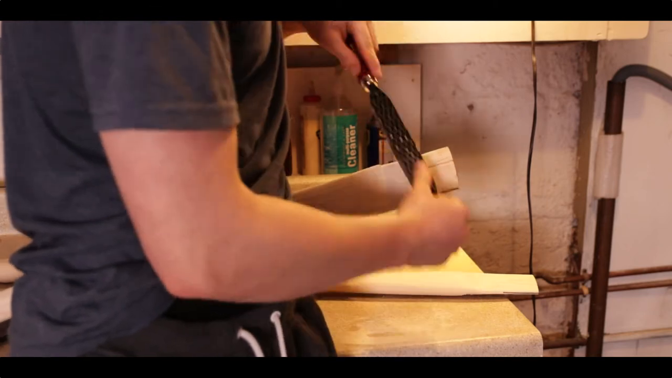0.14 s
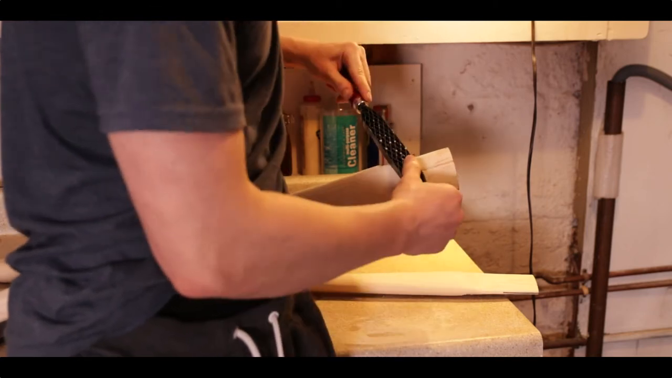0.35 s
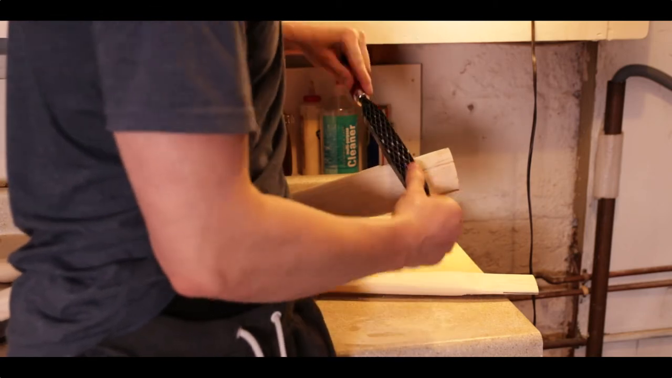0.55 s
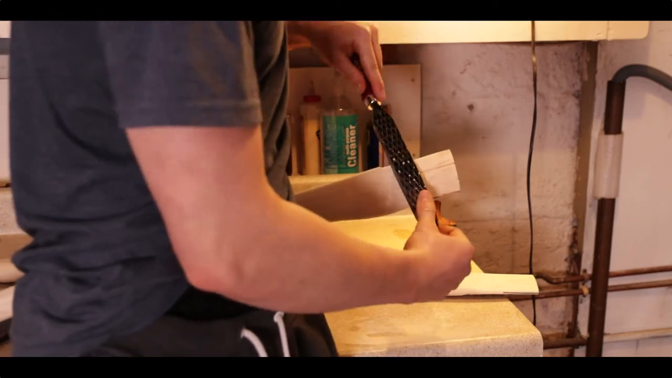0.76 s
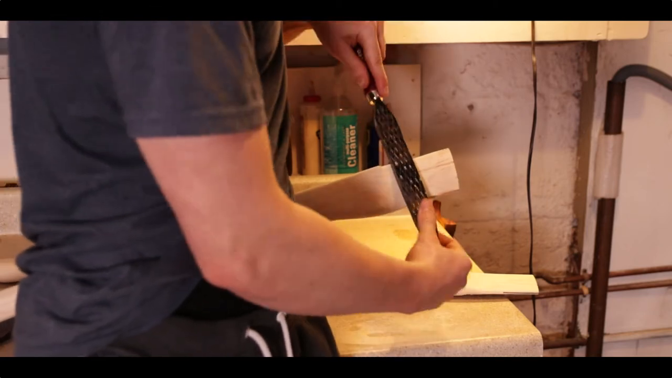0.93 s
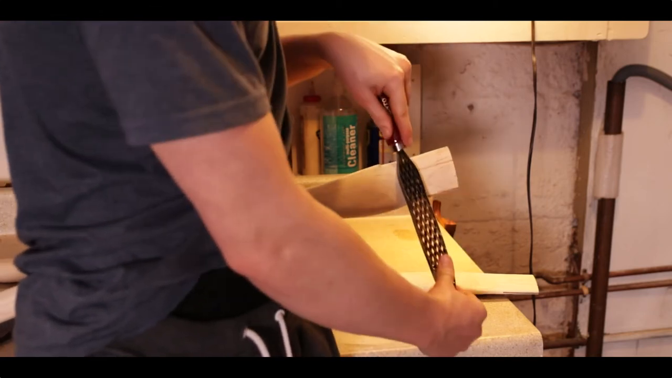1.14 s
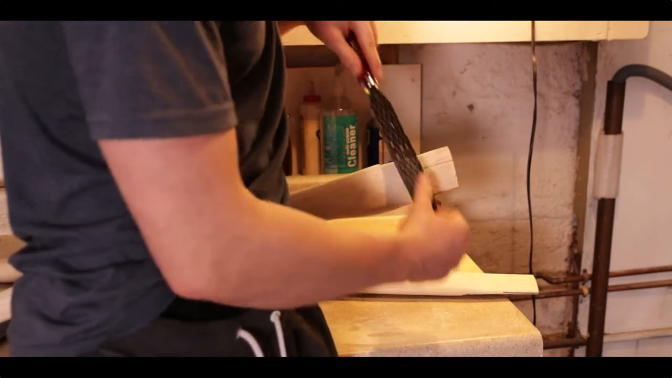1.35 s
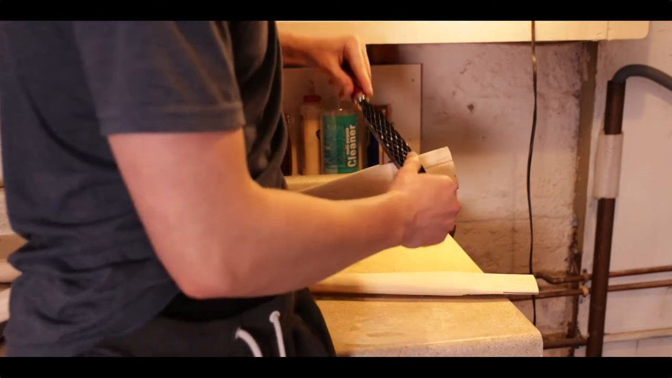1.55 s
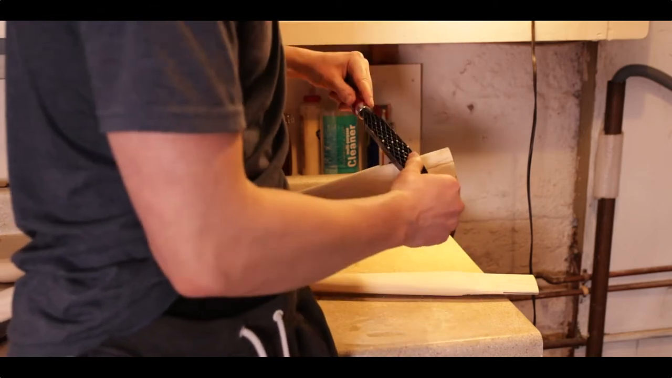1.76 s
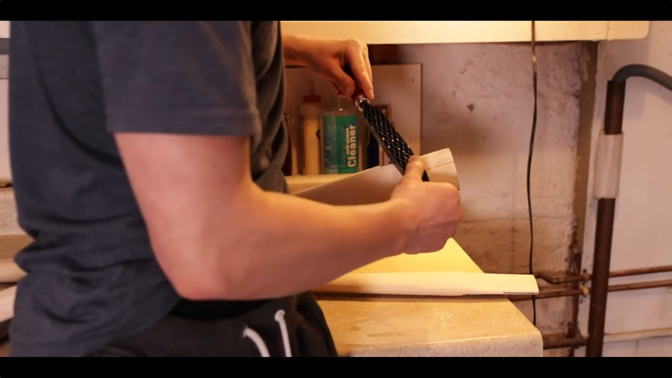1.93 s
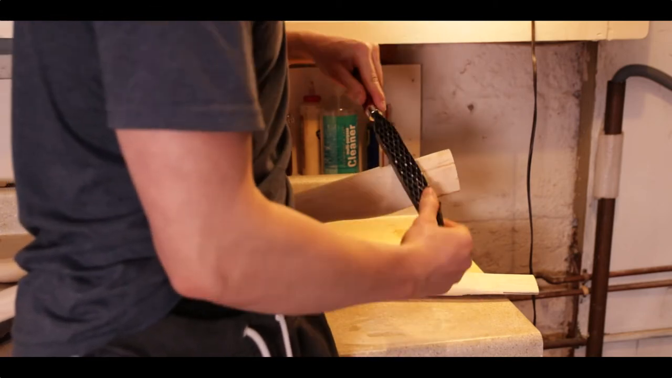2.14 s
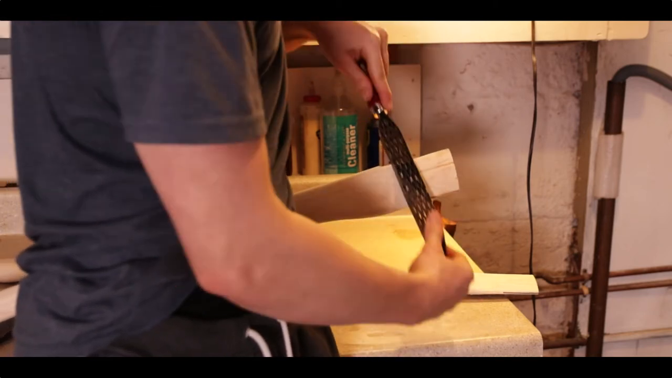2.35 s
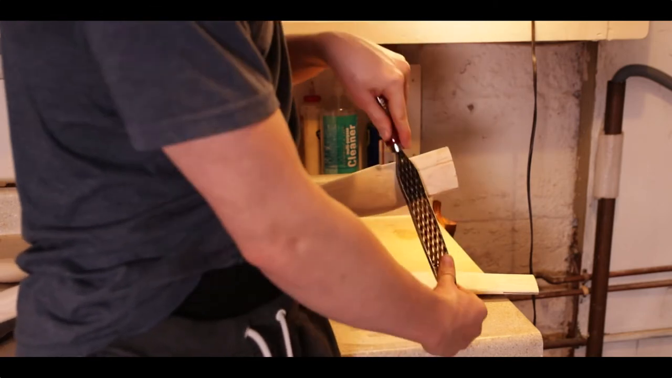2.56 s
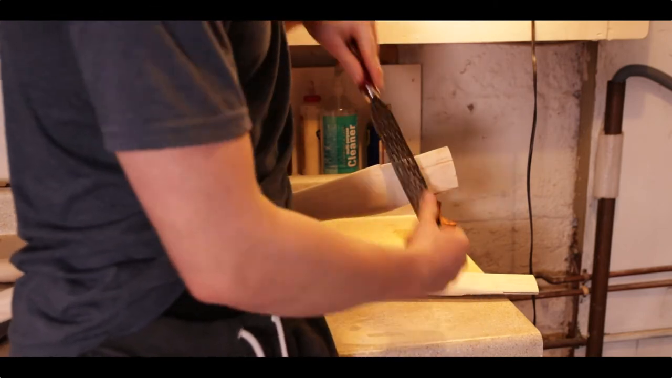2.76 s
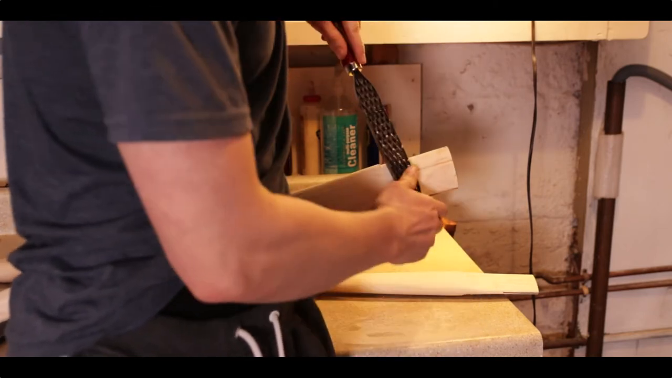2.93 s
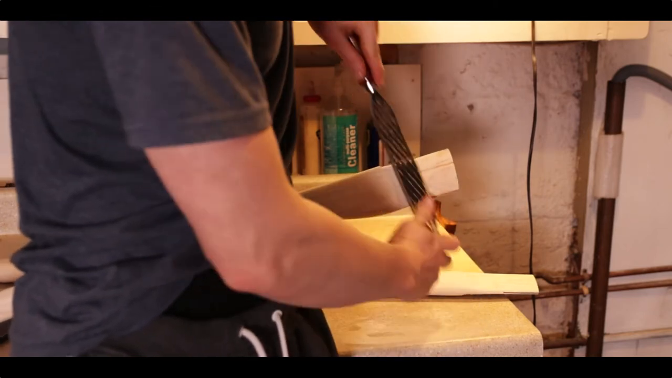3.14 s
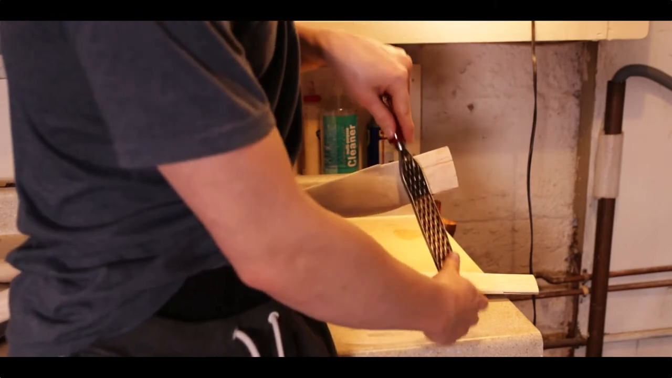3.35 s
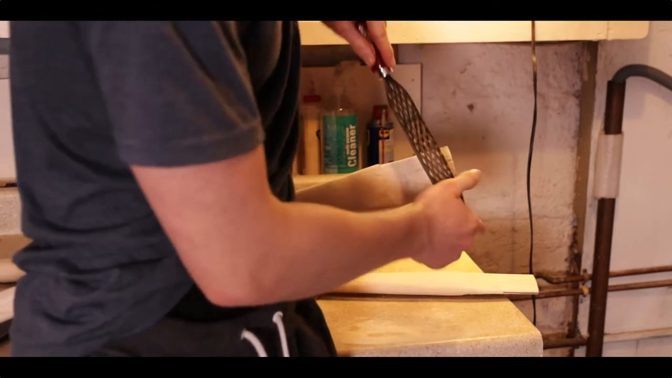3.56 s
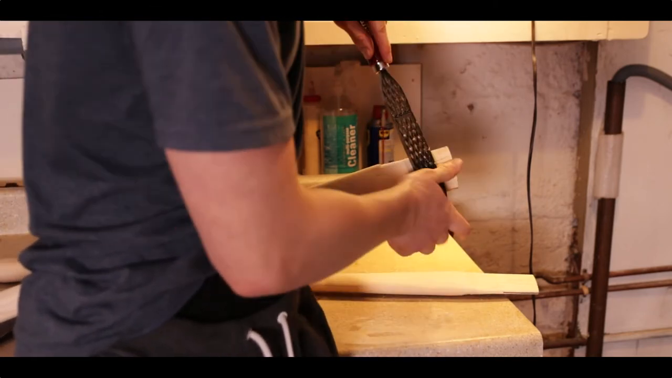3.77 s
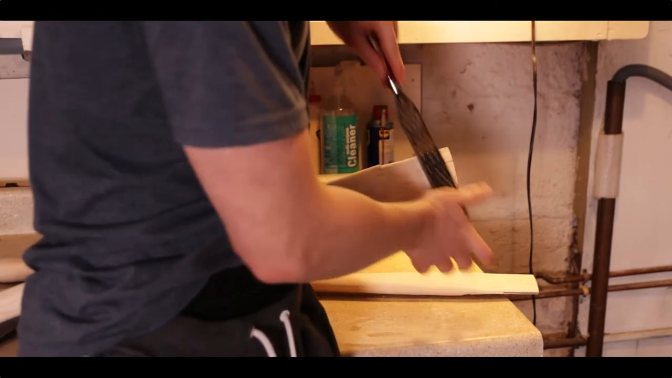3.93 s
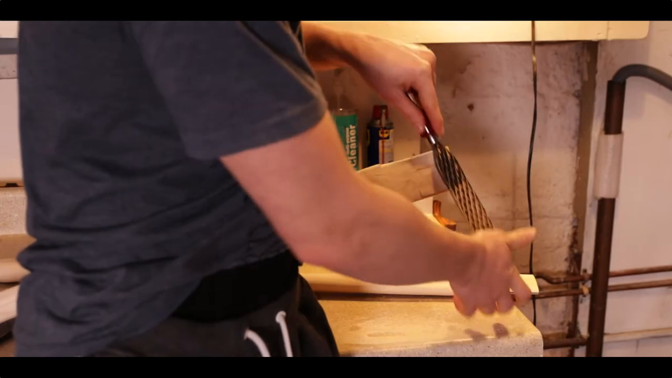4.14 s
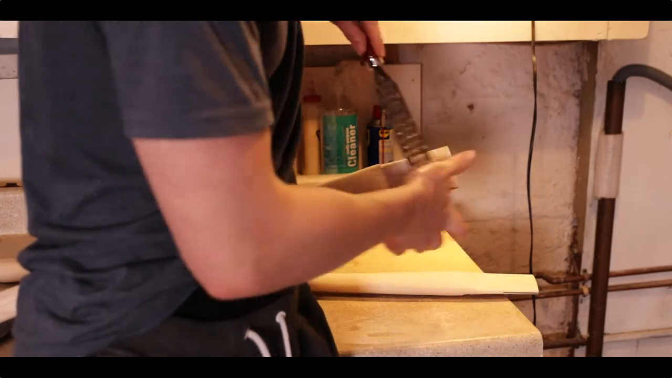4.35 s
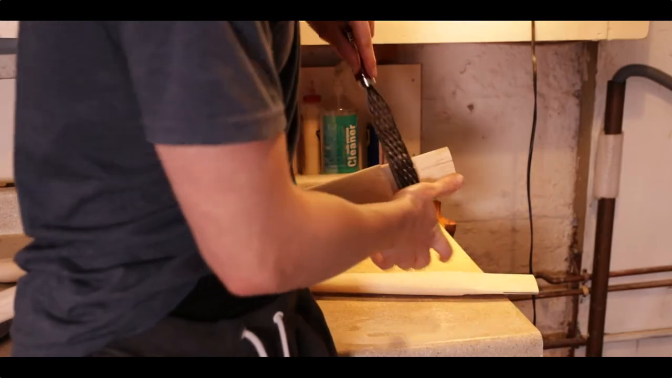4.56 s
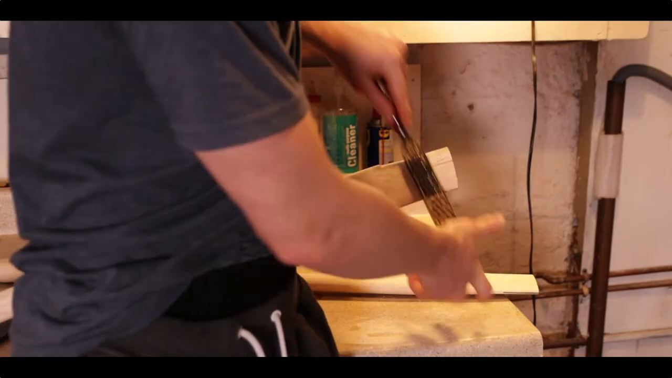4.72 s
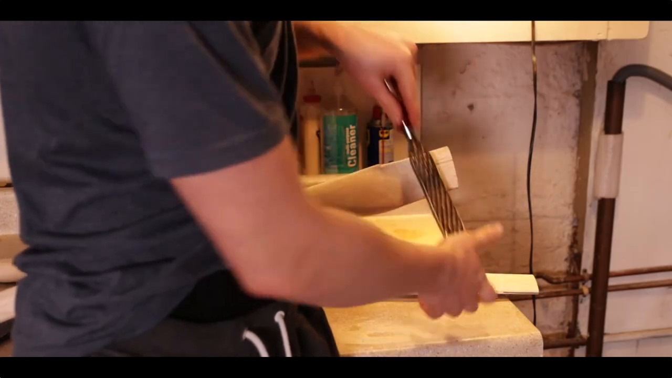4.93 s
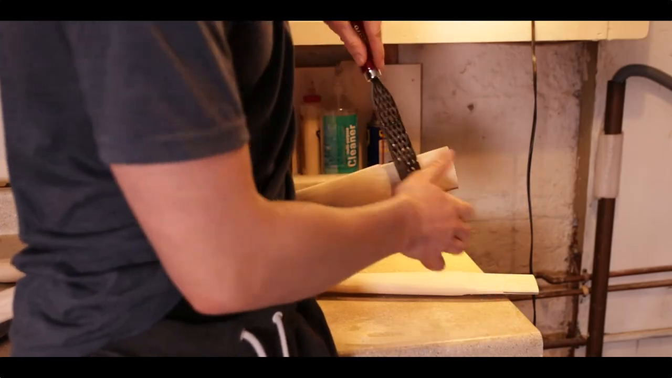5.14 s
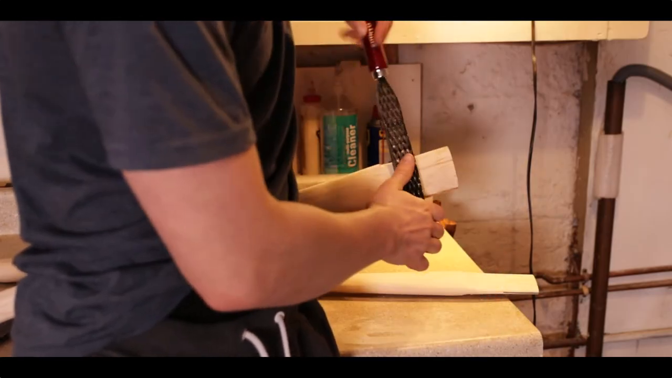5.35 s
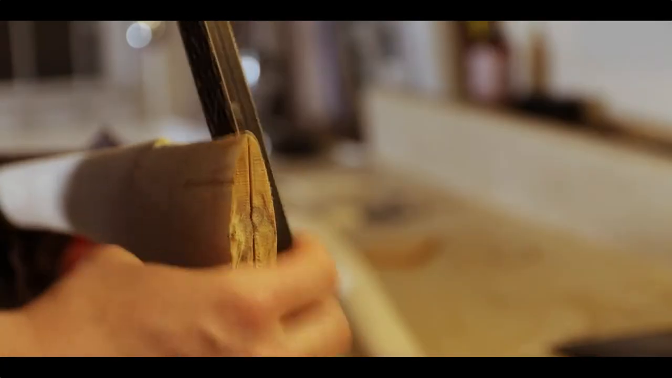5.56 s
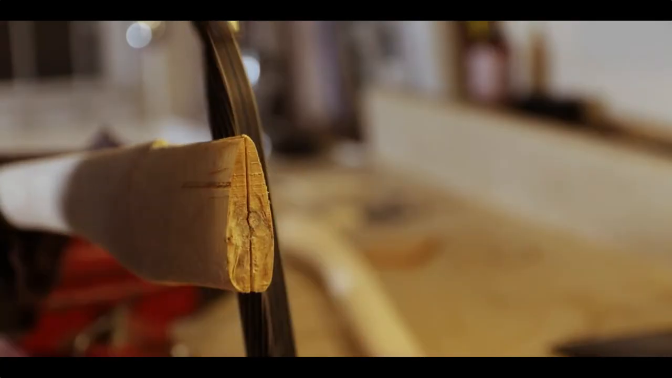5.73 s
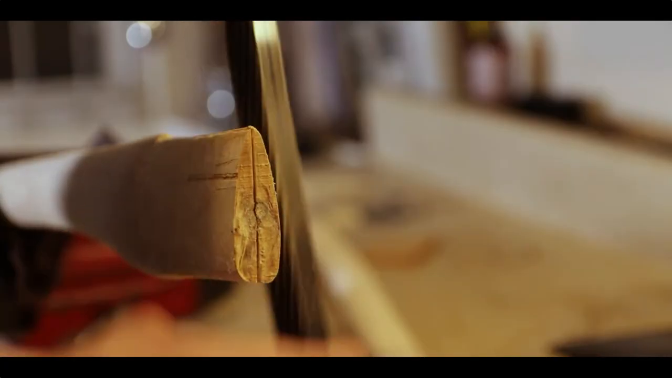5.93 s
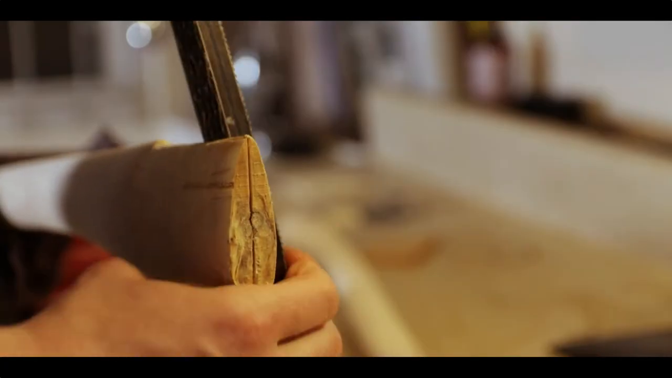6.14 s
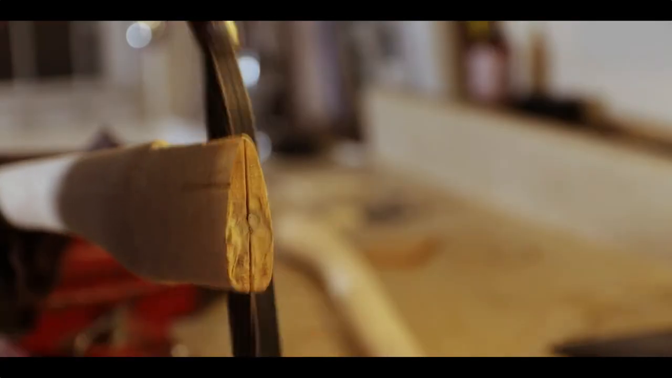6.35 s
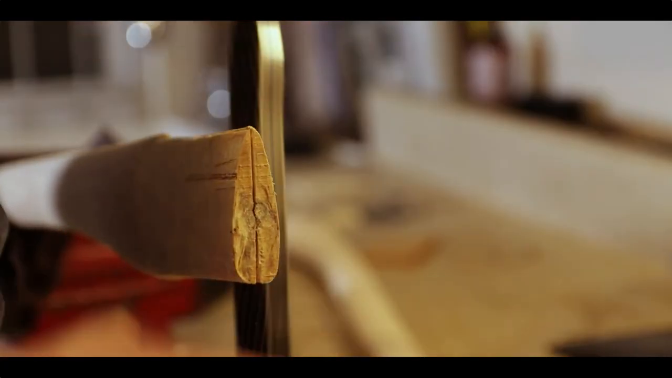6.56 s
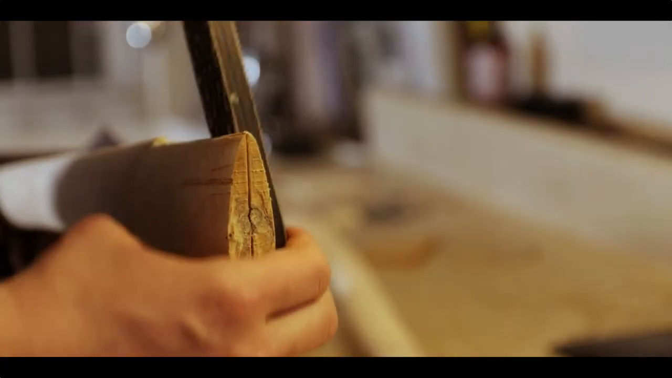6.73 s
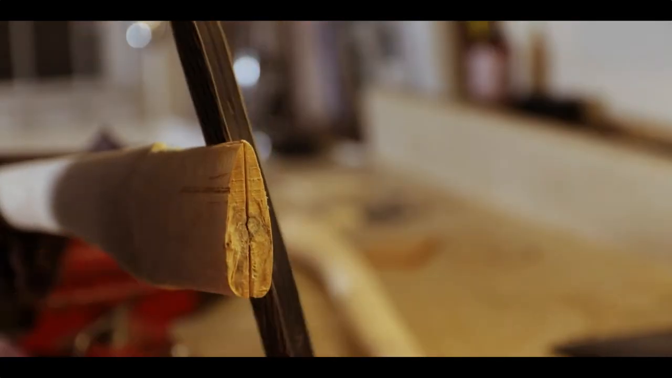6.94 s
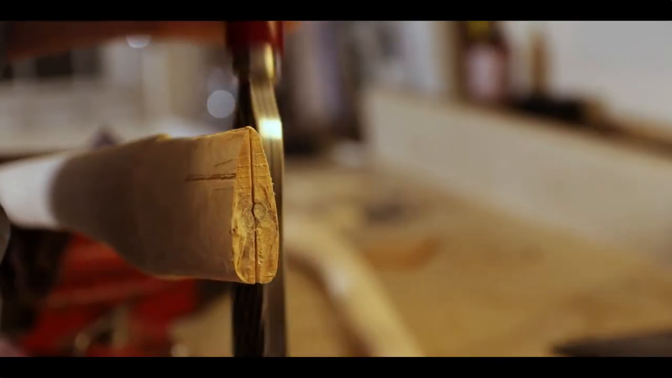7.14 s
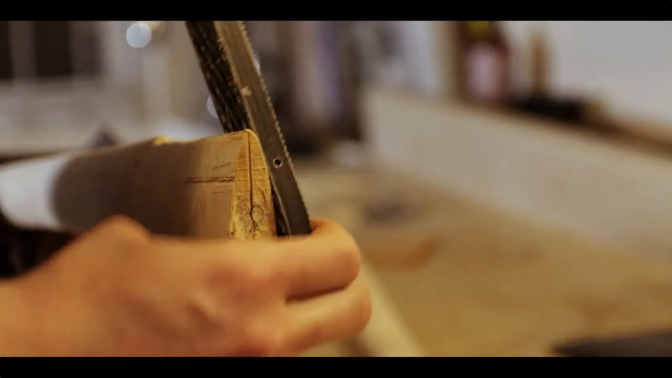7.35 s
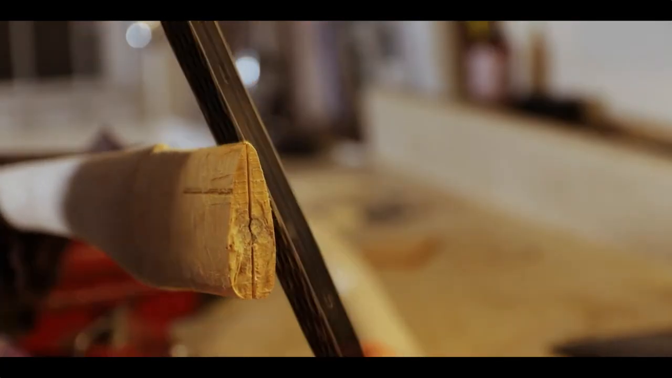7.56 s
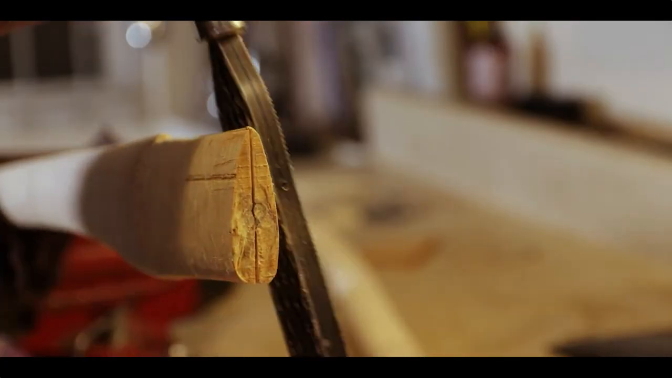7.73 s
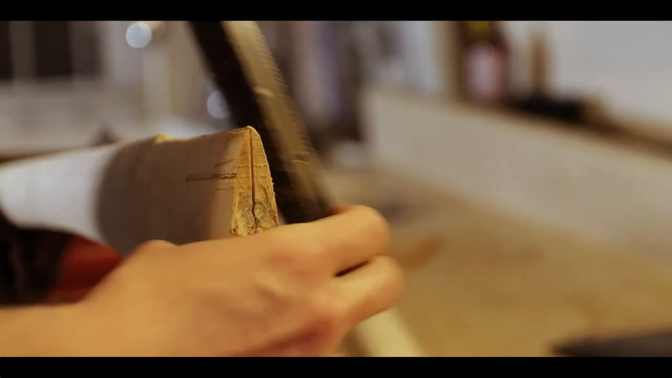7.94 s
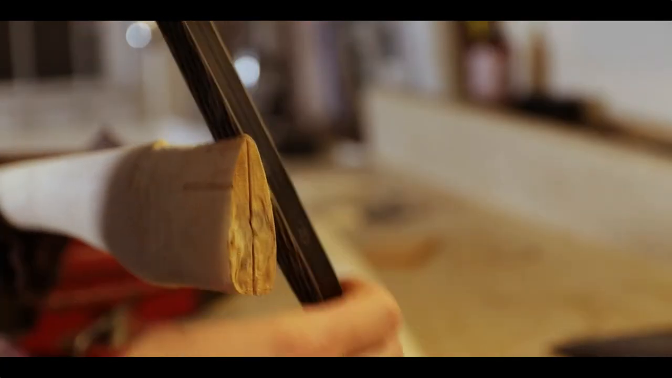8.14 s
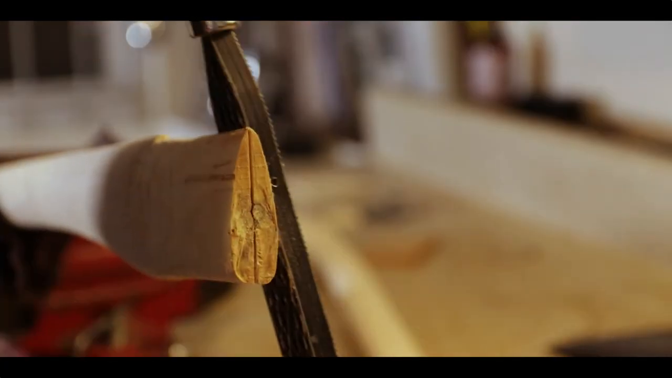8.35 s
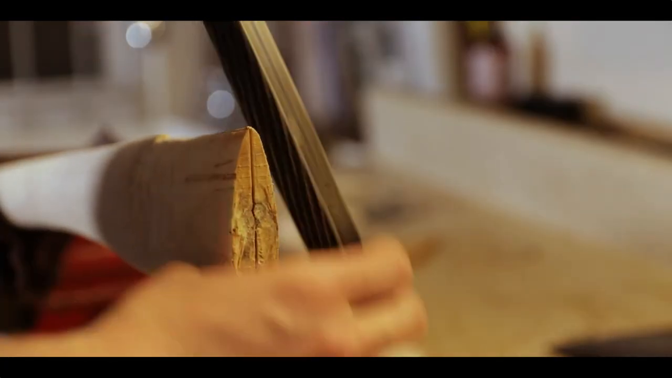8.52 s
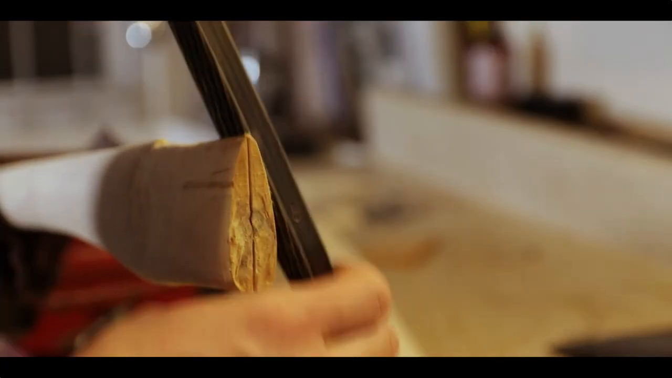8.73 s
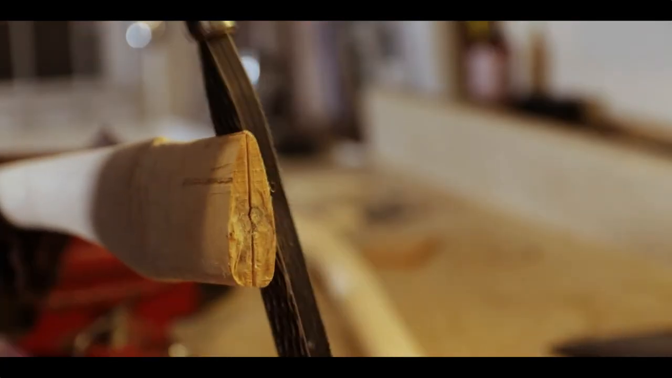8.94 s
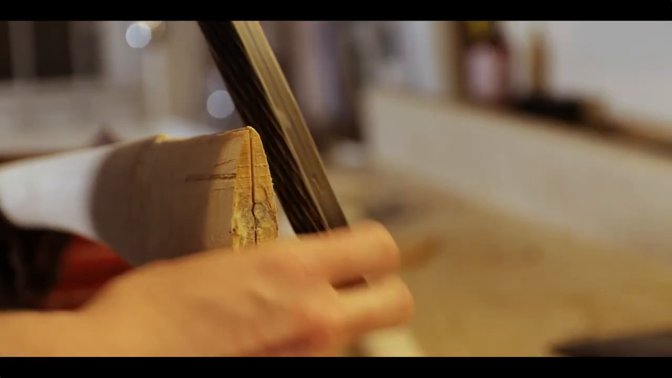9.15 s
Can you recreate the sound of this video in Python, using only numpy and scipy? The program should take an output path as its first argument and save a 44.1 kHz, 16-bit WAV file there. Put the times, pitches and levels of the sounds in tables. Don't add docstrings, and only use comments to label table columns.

```python
import sys
import numpy as np
from scipy import signal
from scipy.fft import rfft, irfft, next_fast_len
from scipy.io import wavfile
from scipy.ndimage import uniform_filter1d, map_coordinates

SR = 44100
rng = np.random.default_rng(int(sys.argv[2]) if len(sys.argv) > 2 else 0)


def volts(x):
    e = np.asarray(x, float) / 20
    return 10 ** e


def waveform_to_disk(signal):
    frames = np.transpose(np.atleast_2d(signal))
    scaled = np.clip(frames, -1, 1) * 32767
    samples = np.round(scaled).astype(np.int16)
    wavfile.write(sys.argv[1], SR, samples)


N = 409688
SPAN = 32768
MOVE_IN = 5.495

# frequency in Hz, density in dB per Hz.
QUIET = [(12, -51.5), (20, 1), (120, 9), (241, 4), (301, 4), (660, -1), (738, -6.5), (4940, -11.5),
         (8180, -13.5), (16000, -16)]
# frequency in Hz, t60 in seconds.
CELLAR = [(100, 0.46), (300, 0.23), (1500, 0.11), (5000, 0.19), (12000, 0.035)]

# frequency in Hz, density in dB per Hz.
FAR = [(18, -114), (30, -36), (88, -6), (157, -1.5), (210, -0.5), (259, -10.5), (666, -10), (1540, -10.5),
       (3310, -14), (5590, -26), (14000, -38.5), (16000, -42.5)]
NEAR = [(18, -53), (30, -23), (88, -8), (245, -13.5), (721, -15), (822, -16), (1910, -13.5), (2540, -11),
        (3670, -13), (5450, -18.5), (12600, -25), (16000, -34)]
# centre in Hz, width in Hz, height in dB.
FAR_MODES = [(101.2, 20.6, 11), (208, 13, 9), (335.6, 45, 6.5), (452, 16, 6), (612, 13, -1), (730, 87, 1.5),
             (948, 41, -1), (1070, 36, -9.5)]
NEAR_MODES = [(96.3, 14, 13), (183, 12, 14.2), (428, 43, 4.8), (579, 8.3, 4), (720.6, 20, 9),
              (743, 14, 6.9), (1924, 46, 8.2), (8600, 1600, 4.1), (12700, 460, 3.6)]
# centre in Hz, width in Hz, dB held loosely, dB held firmly at the tip.
BLADE = [(1345, 55, 14.5, -3), (1421, 42, 4, 3), (1710, 42, 5, 1), (1894, 59, 6, 7.5), (2205, 43, 9.5, 11),
         (2950, 330, -15, 12.5), (3350, 91, 18.5, 2.5), (3552, 63, 2, -0.5), (3730, 81, 4, 12),
         (4454, 200, 3, 7.5), (4960, 89, 3.5, 5), (6900, 80, -12.5, 14)]
# low edge in Hz, high edge in Hz.
EDGES_HZ = [(1200, 5500), (290, 1200), (20, 290), (5500, 20000)]
# time in seconds, firmness from 0 to 1.
FIRM = [(0, 0.85), (3.8, 0.4), (3.9, 0.98), (4.49, 0.56), (7.3, 0.57), (7.45, 1), (9.3, 0.9)]
# time in seconds, level in dB.
LEAN = [(0, 7), (.6, -3), (1.6, 6), (2.0, -8.5), (3.0, 9.5), (3.7, -17), (3.899, 10), (4.502, 2), (4.56, 4),
        (5.2, -5), (5.5, -11.5), (5.6, -1), (6.9, -2), (8, -5.5), (9.3, 3)]

# start in seconds, rise in seconds, hold in seconds, pressure in dB, brightness in dB.
DRAGS = [
    (0, 0.00067, 0.0014, -41, 0),
    (6.64, .17, 0.032, -31.5, 0),
]
HOVERS = [
    (.38, 0.017, 0.17, -51, 0),
    (1.25, 0.032, 0.53, -51, 0.0068),
    (1.7, 0.025, 0.11, -66, 0),
    (3.84, .05, .01, -44, 0),
    (7.27, .09, 0.017, -43, 0),
    (7.86, 0.12, 0.052, -40.5, 0),
    (9.12, 0.2, 0.0304, -42, 0),
]
DIGS = [
    (.594, .084, 0.012, -19, 0),
    (2.006, 0.1, 0.0089, -15.5, 0),
    (2.327, 0.095, 0.18, -16, -4.5),
]
SKIMS = [
    (.95, .07, 0.12, -20, 0.0084),
    (4.563, .09, .03, -18, 0),
]
FAR_PUSHES = [
    (3.0, 0.25, 0.0086, -13.5, -0.5),
    (3.905, 0.057, 0.16, -15.5, 3),
    (4.71, 0.039, 0.0686, -13.5, -3),
]
NEAR_PUSHES = [
    (5.608, 0.0094, 0.22, -16.5, 0),
    (6.213, 0.028, 0.21, -17, 0.63),
    (6.85, 0.0069, .15, -17, 0),
    (7.035, 0.0072, 0.069, -19.5, 0.067),
    (7.46, 0.034, 0.24, -18, 0.82),
    (8.14, 0.00465, .22, -18, 1),
    (8.752, 0.0071, 0.23, -18.5, 1),
]
# dB at full pressure, dB at first touch, sag in dB per second and release in dB
# per second, all four for blade, handle and hiss; then bench in dB, handle in Hz from, handle in Hz to.
DRAG = ((-3.5, 0.86, -16.5), (-9, -21, 5.5), (1, 1, 1), (71, 200, 300), -2, 520, 600)
HOVER = ((0, -11.5, -6.5), (-7.5, -1, -27), (5.6, 20, 5), (680, 490, 400), 1, 479, 740)
DIG = ((-1.2, 2.7, -15.5), (-12, -14.5, 4.6), (39, 90, 3.6), (124, 110, 420), -6, 546, 594)
SKIM = ((0, 2, -8), (-19, -15.5, -13), (41, 94, 13), (250, 140, 240), -7, 530, 610)
FAR_PUSH = ((0, -1.76, -6.5), (-21.5, -20.5, -23.5), (30, 0, 68), (183, 130, 195), -6, 467, 634)
NEAR_PUSH = ((3.98, -2, -3.5), (-7, -4, -7), (23.4, 3.5, 21), (156, 110, 180), -0.77, 677, 602)

# start in seconds, knock in dB, wood over steel in dB, scrape in dB, fade in dB per second.
SETDOWNS = [(0.3113, -36, -12.5, -30.5, 245.5), (1.6144, -33, 19, -30.5, 169),
            (2.9582, -52, -19, -26.5, 254), (3.7678, -26.5, -1, -24.5, 255), (4.5037, -26, 2, -26.5, 202.5),
            (5.241, -28.5, 6, -32.5, 60), (5.2802, -19.5, -2, -28, 117.5), (5.5009, -19.5, 5.5, -22.5, 53),
            (6.103, -9, -26, -24, 108), (7.3811, -27, 3, -20.5, 199), (8.0189, -19, 10.5, -22, 170.5),
            (8.654, -15, 1, -23, 150.5), (9.2744, -13, 7.5, -39, 297)]
# start in seconds, peak in dB, wood over steel in dB.
BITES = [(0.595, -17.5, -21.5), (0.6658, -5, 1.5), (.7647, -18, 11.5), (0.953, -26, 13), (.985, -19, 13),
         (1.002, -13, 10.5), (2.0086, -24, 3), (2.0913, -3.5, 3), (2.328, -13.5, 9.5), (2.384, -8.5, 5.5),
         (2.4229, -6.5, 2), (2.489, -20, 14), (2.5366, -16.5, 12), (4.67, -20.5, 14), (5.839, -15, 14),
         (7.09, -12.5, 8), (8.9, -12.5, 2.5)]
TICKS = [(4.7235, -6.5, 1), (5.5424, -11, -2), (6.5308, -19, -16.5), (6.6423, -25, -17),
         (6.696, -22.5, -1.5), (6.7645, -25, -19), (6.788, -20.5, 0.5), (6.8215, -19, -4), (7.3994, -33, 1),
         (7.4144, -35.5, 3), (8.6674, -20, 15), (9.2344, -30, -3)]

# frequency in Hz, contact in seconds, t60 in seconds.
LOOSE = [(209.7, .012, 0.35), (1343, 0.0082, 0.036)]
# start in seconds, bench top peak in dB, free blade peak in dB.
LOOSE_HITS = [
    (.313, -21, -28.5),
    (0.604, -17, -50),
    (1.617, -19, -23),
    (2.008, -25, -46),
    (2.953, -40, -16),
    (3.769, -31, -21.5),
    (4.506, -12, -17),
    (5.242, -52, -26),
    (5.283, -38, -5.5),
]
# frequency in Hz, contact in seconds, t60 in seconds.
HELD = [(2253, 0.0026, .018), (3357, 0.004, 0.022), (1350, 0.0096, 0.07)]
# start in seconds, then the peak of each of the three modes in dB.
HELD_HITS = [
    (6.105, -3, -5, -21),
    (8.022, -14, -51, -44),
    (8.651, -6.5, -28, -38),
]
# start in seconds, frequency in Hz, peak in dB, contact in seconds, t60 in seconds.
LANDINGS = [
    (5.279, 1592, -10.5, 0.016, 0.01),
    (2.955, 1076, -21, 0.0071, 0.037),
    (8.654, 1067, -17, 0.0092, 0.043),
    (8.656, 367, -20, 0.007, 0.0436),
    (9.115, 53.9, -20.5, 0.05, 0.46),
    (9.118, 111, -21.5, 0.052, .2),
]

# start in seconds, peak in dB.
RATTLES = [
    (2.594, -29.5),
    (2.673, -32),
    (2.777, -33),
    (2.872, -32.5),
    (4.964, -25),
    (5.047, -22),
    (5.133, -25),
    (5.217, -27),
    (5.401, -32),
]
# frequency in Hz, level in dB, t60 in seconds.
OFFCUT = [(471, 1, 0.14), (604, -8, 0.12), (700, -9, 0.03), (867, -8, 0.019), (1173, -9, 0.028)]
# start in seconds, peak in dB.
SNAP = [
    (3.479, -3),
]
# start in seconds, frequency in Hz, level in dB, length in seconds.
SLIDES = [
    (7.336, 8600, -63, 0.027),
    (7.95, 8180, -47, 0.053),
    (8.612, 8500, -51.5, 0.022),
    (9.204, 9200, -52, 0.054),
]


def unit(x):
    return x / np.sqrt(np.mean(np.abs(x) ** 2) + 1e-20)


def along(points, hz):
    f, v = np.transpose(points)
    return np.interp(np.log(hz + 1), np.log(f + 1), v)


def quiet():
    m = next_fast_len(N)
    colour = volts(along(QUIET, np.fft.rfftfreq(m, 1 / SR)))
    noise = irfft(rfft(rng.standard_normal(m)) * colour, m)
    return volts(-54.5) * unit(noise[:N])


def contacts():
    out = []
    let_go_db = 42
    ease_s = 0.035
    far_ease_db, near_ease_db = (4.5, 4.5, 6.5), (13, 5.5, 22)
    kinds = ((DIGS, DIG), (FAR_PUSHES, FAR_PUSH), (NEAR_PUSHES, NEAR_PUSH),
             (SKIMS, SKIM), (DRAGS, DRAG), (HOVERS, HOVER))
    for rows, kind in kinds:
        full, touch, sag, release, bench_db, low_hz, high_hz = map(np.array, kind)
        for s, rise, hold, db, bright_db in rows:
            top = db + full + bright_db * np.array([1, 0, 2])
            fall = min(let_go_db / release[1], 0.4)
            lift = top - sag * hold
            eased = lift - np.array(far_ease_db if s < MOVE_IN else near_ease_db)
            times = s + np.cumsum([0, rise, hold, ease_s, fall])
            levels = [top + touch, top, lift, eased, eased - release * fall]
            out.append((times, levels, bench_db, low_hz, high_hz))
    set_db, set_fades, set_bench_db, set_hz = (-9, -0.5, -18.5), (0.77, 1.03, 1.2), -2, 498
    for s, _, _, db, fade in SETDOWNS:
        fall = min(let_go_db / fade, 0.11 + fade / 1000)
        top = db + np.array(set_db)
        levels = [top, top - fade * fall * np.array(set_fades)]
        out.append((np.array([s, s + fall]), levels, set_bench_db, set_hz, set_hz))
    return sorted(out, key=lambda c: c[0][0])


def jolts():
    downs = [(s, db, wood, -49 if s < MOVE_IN else -15.5) for s, db, wood, _, _ in SETDOWNS]
    bites = [(*row, -23.5) for row in BITES]
    ticks = [(*row, -13.5) for row in TICKS]
    return downs + bites + ticks


def causal(gain):
    c = irfft(np.log(gain + 1e-6))
    half = len(c) // 2
    c[1:half] *= 2
    c[half + 1:] = 0
    return np.exp(rfft(c))


def body(hz, colour, modes, grip_db):
    gain = volts(along(colour, hz))
    for (c, w, db), chance in zip(modes, rng.standard_normal(len(modes))):
        peak = volts(2 * (db + grip_db * chance)) / (1 + (2 * (hz - c) / w) ** 2)
        gain = gain * np.sqrt(1 + peak)
    return gain


def teeth(size, rate, spread_db, fibre, patchy_db):
    hit = rng.random(size) < rate / SR
    strength = volts(spread_db * np.minimum(rng.exponential(size=size), 4))
    shocks = hit * strength * rng.standard_normal(size)
    chatter = map_coordinates(rng.standard_normal(size // 300 + 4), [np.arange(size) / 300])
    tearing = unit(shocks) + fibre * rng.standard_normal(size)
    z = signal.stft(tearing * volts(1.7 * chatter), nperseg=256)[2]
    field = uniform_filter1d(rng.standard_normal(z.shape), size=4, axis=0)
    field = uniform_filter1d(field, size=10, axis=1)
    return unit(signal.istft(z * volts(patchy_db * unit(field)), nperseg=256)[1][:size])


def sweep(x, centre_hz, width_hz):
    out = np.zeros(len(x))
    for hz in np.arange(360, 860, 80):
        near = np.clip(1 - np.abs(centre_hz - hz) / 80, 0, 1)
        out += np.sqrt(near) * signal.lfilter(*signal.iirpeak(hz, hz / width_hz, SR), x)
    return out


def layer_band(hz, low_hz, high_hz):
    slopes = (1 + (low_hz / (hz + 1)) ** 8) * (1 + (hz / high_hz) ** 8)
    return causal(1 / np.sqrt(slopes * (1 + (45 / (hz + 1)) ** 4)))


def rasp():
    out, hz = np.zeros(N + SPAN), np.fft.rfftfreq(SPAN, 1 / SR)
    age = np.arange(SR // 12) / SR
    bands = [layer_band(hz, low, high) for low, high in EDGES_HZ]
    wander_db, wander_s = (0.63, 2.07, 1, 1.33), 0.0301
    touches, glide = contacts(), []
    starts = [c[0][0] for c in touches[1:]] + [N / SR]
    for (s, levels, bench_db, low_hz, high_hz), after in zip(touches, starts):
        blade_db, handle_db, hiss_db = np.transpose(levels)
        firm, rock_db = (np.interp(s[0], *np.transpose(curve)) for curve in (FIRM, LEAN))
        glide += [(s[0], low_hz), (min(s[-2] + 0.04, after - 0.002), high_hz)]
        start = round(s[0] * SR)
        size = max(round((s[-1] - s[0]) * SR), 512)

        colour, wood = (FAR, FAR_MODES) if s[0] < MOVE_IN else (NEAR, NEAR_MODES)
        steel = [(c, w, loose + np.clip(firm, 0, 1) * (tight - loose)) for c, w, loose, tight in BLADE]
        rocking = volts(rock_db / (1 + (np.log((hz + 1) / 92) / 0.48) ** 4))
        response = causal(body(hz, colour, wood + steel, grip_db=1.2) * rocking)

        t = s[0] + np.arange(size) / SR
        heavy_db = 0.54 * (handle_db + 19) - 21.5 + bench_db
        press_db = np.array([np.interp(t, s, db) for db in (blade_db, handle_db, heavy_db, hiss_db)])
        knots = rng.standard_normal((len(bands), 64))
        press_db += [db * map_coordinates(k, [(t - s[0]) / wander_s]) for db, k in zip(wander_db, knots)]
        shocks = teeth(size, rate=5000, spread_db=2.6, fibre=0.75, patchy_db=2.2)
        drive = np.zeros((len(bands), SPAN))
        drive[:, :size] = shocks * volts(press_db - 1.2)

        for when, peak_db, knock_db, bright_db in jolts():
            if s[0] - 0.005 <= when < after - 0.005:
                kick_db = peak_db + np.array([[-3.5], [knock_db - 4.5], [knock_db - 8.0], [bright_db + 3]])
                onset = 1 - np.exp(-age / 0.00029)
                jolt = volts(kick_db - 60 * age / 0.062) * onset * rng.standard_normal(len(age))
                drive[:, max(round(when * SR) - start, 0):][:, :len(age)] += jolt
        spectrum = sum(push * unit(response * band) for push, band in zip(rfft(drive), bands))
        out[start:start + SPAN] += irfft(spectrum, SPAN)
    centre_hz = np.interp(np.arange(N) / SR, *np.transpose(glide))
    return 0.69 * out[:N] + 1.183 * sweep(out[:N], centre_hz, width_hz=116.4)


def cellar(x):
    hz, t, z = signal.stft(rng.standard_normal(SR * 3 // 4), SR, nperseg=256)
    decay = volts(-60 * t / along(CELLAR, hz)[:, None])
    tail = signal.istft(z * decay, SR, nperseg=256)[1]
    delayed = np.pad(x, (SR // 150, 0))
    return signal.fftconvolve(delayed, tail / np.linalg.norm(tail))[:N]


def struck(hz, contact, t60, rough):
    t = np.arange(SR // 4) / SR
    grit = 1 + rough * rng.standard_normal(len(t)) * np.sqrt(SR / hz)
    push = grit * np.cos(2 * np.pi * hz * t)
    dying = volts(-60 * t / t60) * np.sin(2 * np.pi * hz * t)
    ring = signal.fftconvolve(push[t < contact], dying)[:len(t)]
    return ring / np.abs(ring).max()


def landings():
    out = np.zeros(N + SR)
    knocks = list(LANDINGS)
    for modes, hits in ((LOOSE, LOOSE_HITS), (HELD, HELD_HITS)):
        for s, *levels in hits:
            knocks += [(s, hz, db, contact, t60) for (hz, contact, t60), db in zip(modes, levels)]
    for s, hz, db, contact, t60 in knocks:
        out[round(s * SR):][:SR // 4] += volts(db) * struck(hz, contact, t60, rough=1.55)
    return out[:N]


def offcut():
    out, t = np.zeros(N + SR), np.arange(SR // 4) / SR
    for s, db in RATTLES:
        ring = sum(volts(level + rng.normal(0, 4.4)) * struck(hz, 0.016, t60, rough=1.0)
                   for hz, level, t60 in OFFCUT)
        puff = uniform_filter1d(rng.standard_normal(len(t)), size=12) * volts(-12 - 60 * t / 0.39)
        out[round(s * SR):][:len(t)] += volts(db + 1.5) * (ring + puff)
    return out[:N]


def splinter():
    out, t = np.zeros(N), np.arange(SR // 20) / SR
    for s, db in SNAP:
        out[round(s * SR):][:len(t)] += volts(db - 60 * t / 0.0016) * rng.standard_normal(len(t))
    return signal.sosfilt(signal.butter(3, [2600, 10000], "band", fs=SR, output="sos"), out)


def fingers():
    out = np.zeros(N + SR)
    for s, hz, db, length in SLIDES:
        t = np.arange(round(length * SR)) / SR
        narrow = uniform_filter1d(rng.standard_normal(len(t)), size=60) * np.sin(2 * np.pi * hz * t)
        out[round(s * SR):][:len(t)] += volts(db) * unit(narrow) * np.sqrt(t / length)
    return out[:N]


def scene():
    work = rasp() + landings() + offcut() + splinter() + fingers()
    wet_db = np.where(np.arange(N) < MOVE_IN * SR, -9, -13)
    return (work + cellar(volts(wet_db) * work) + quiet())[None]


def low_pass(x):
    return signal.sosfilt(signal.butter(12, 16500, fs=SR, output="sos"), x)


def record(dry):
    rounded = dry / (1 + np.abs(dry) ** 8) ** (1 / 8)
    band_limit = signal.ellip(8, 0.5, 40, 15900, fs=SR, output="sos")
    mix = signal.sosfilt(band_limit, rounded)
    return low_pass(mix)


dry = scene()
out = record(dry)
waveform_to_disk(out)
```